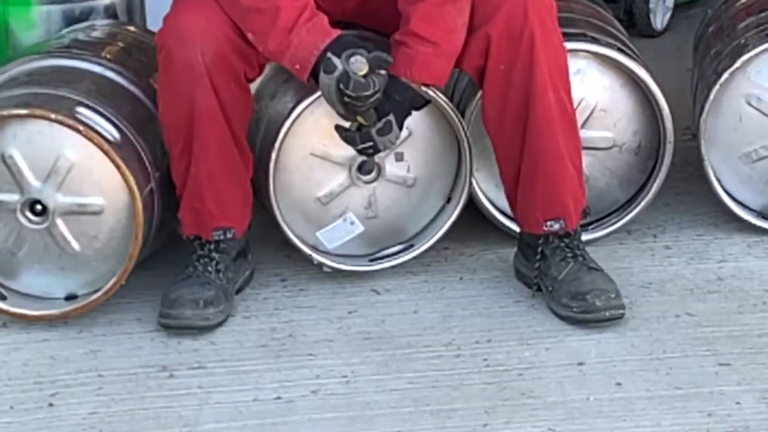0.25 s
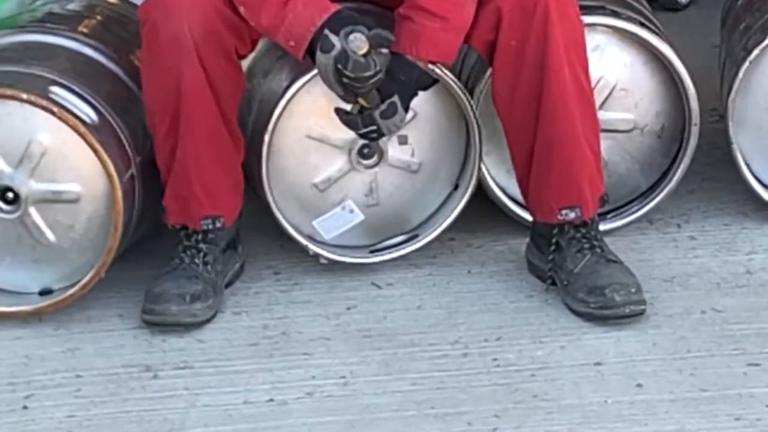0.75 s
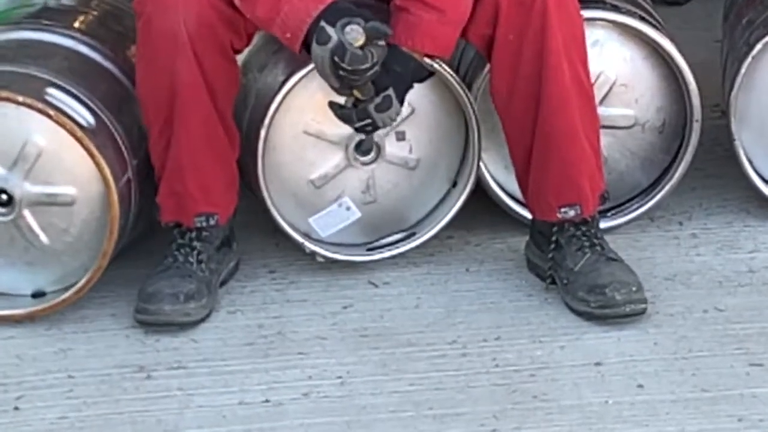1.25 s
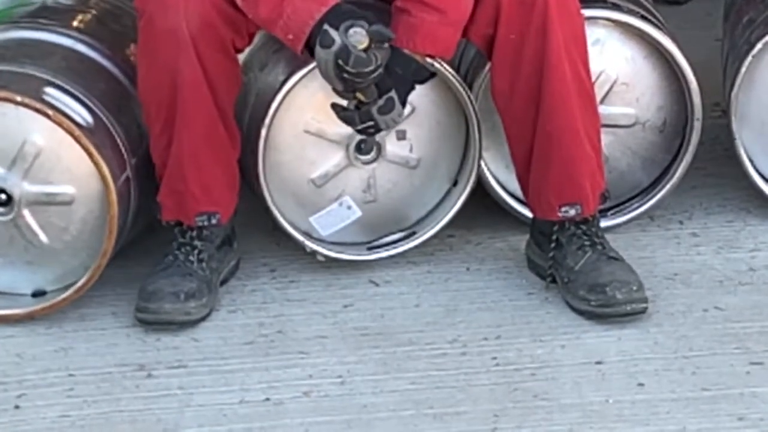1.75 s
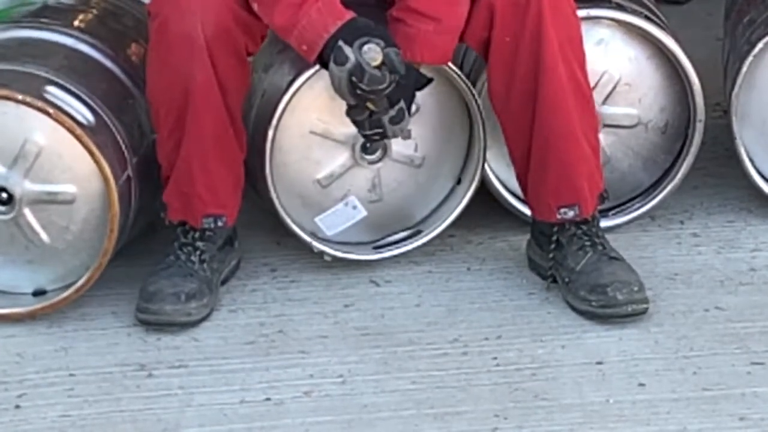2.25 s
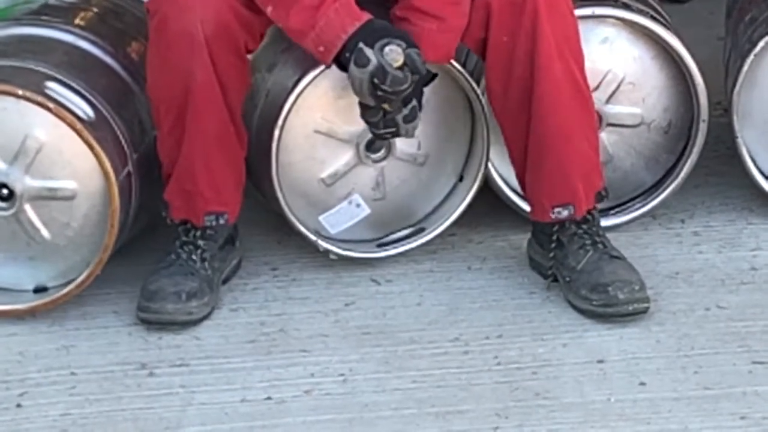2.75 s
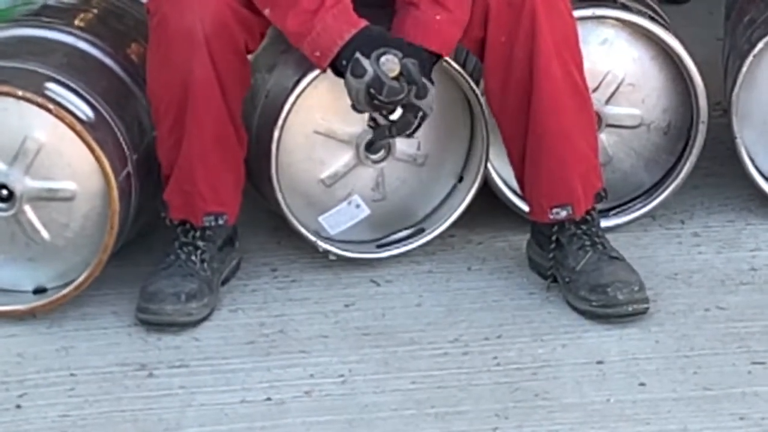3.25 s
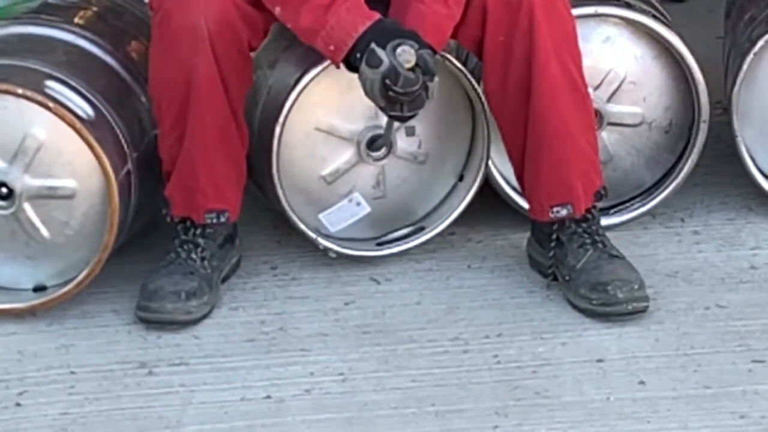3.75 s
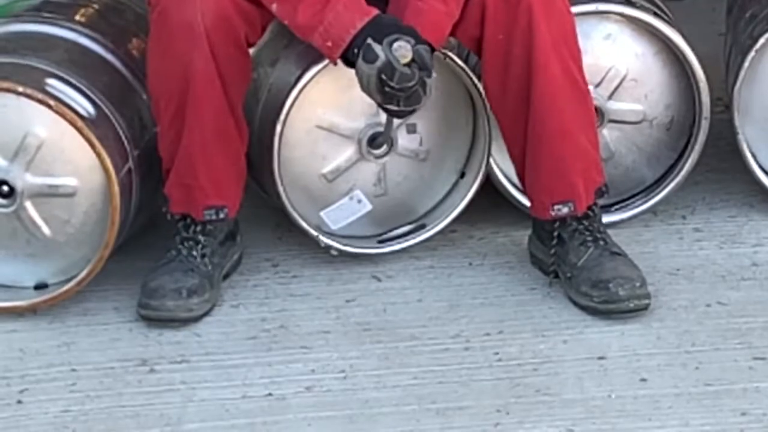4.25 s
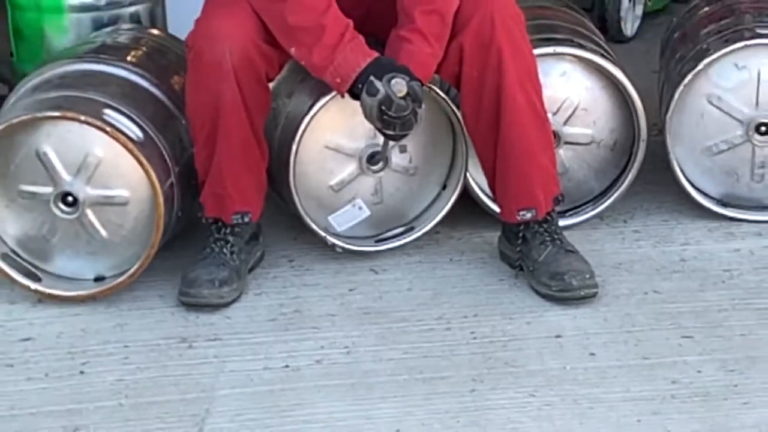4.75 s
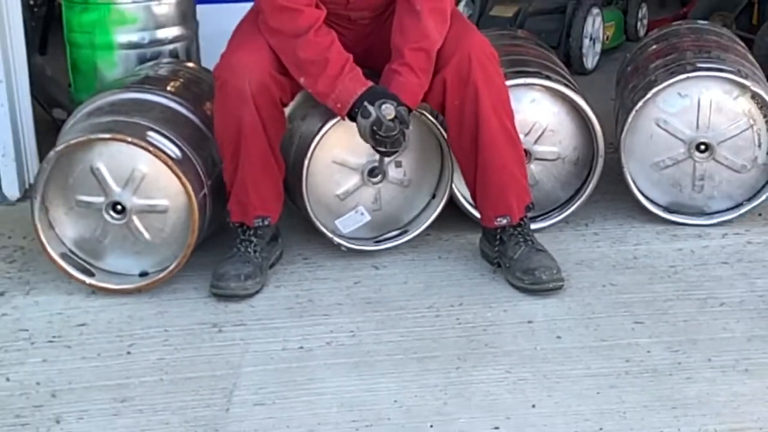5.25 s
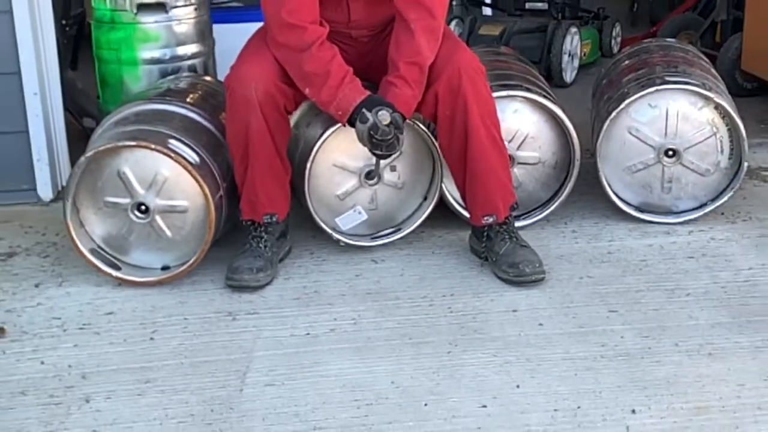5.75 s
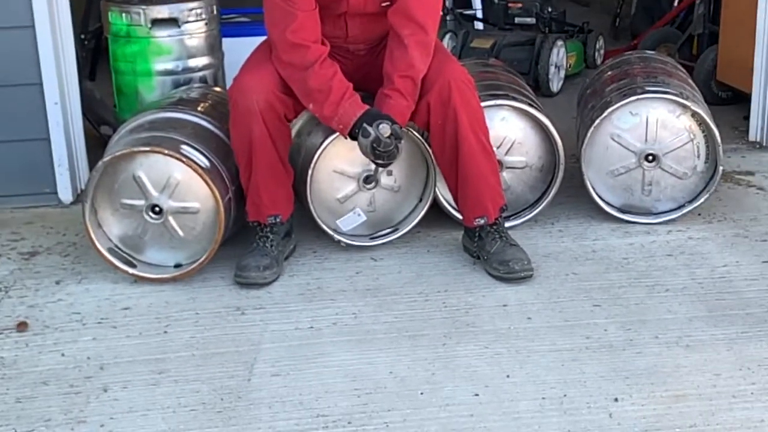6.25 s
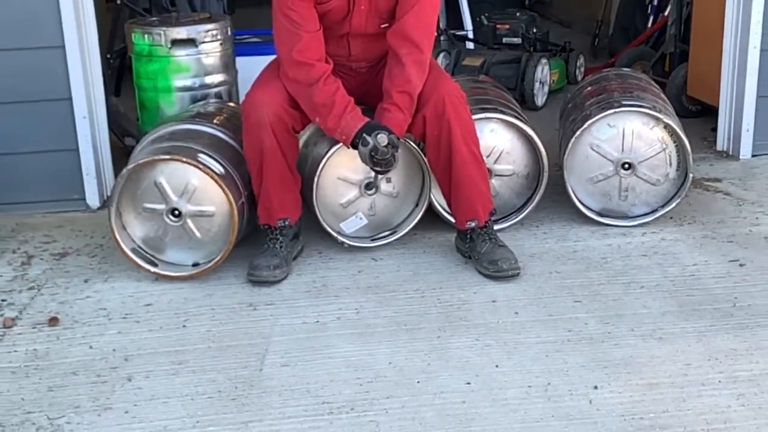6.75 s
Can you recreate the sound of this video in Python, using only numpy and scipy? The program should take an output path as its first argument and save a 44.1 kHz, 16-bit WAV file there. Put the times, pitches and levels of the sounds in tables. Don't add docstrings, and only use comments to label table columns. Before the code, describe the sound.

Metal tool knocks on a hollow keg and short gas spits, then a valve cracks open into a loud, bright hiss that slowly fades.

```python
import sys
import numpy as np
from scipy import signal
from scipy.fft import rfft, irfft, next_fast_len
from scipy.io import wavfile
from scipy.ndimage import uniform_filter1d

SR = 44100
rng = np.random.default_rng(int(sys.argv[2]) if len(sys.argv) > 2 else 0)


def attenuation_scalar(level_db):
    decades = np.asarray(level_db, float) / 20
    return 10 ** decades


def wrap_up_sound(samples):
    columns = np.atleast_2d(samples).T
    tamed = np.clip(columns, -1, 1)
    steps = np.round(tamed * 32767).astype(np.int16)
    wavfile.write(sys.argv[1], SR, steps)


N = 308259
T = np.arange(N) / SR
SIZE = next_fast_len(N + SR)
HZ = np.arange(SIZE // 2 + 1) * SR / SIZE
GRIP_S = 5.225


def unit(x):
    return x / np.sqrt(np.mean(x ** 2))


def read(table):
    f, v = np.transpose(table)
    return np.interp(np.log(HZ + 1), np.log(f), v)


def shape(x, gain):
    return irfft(rfft(x, SIZE) * gain, SIZE)[..., :N]


def hump(hz, width_hz):
    return 1 / (1 + (2 * (HZ - hz) / width_hz) ** 2)


def walk(rate):
    hold = int(SR / rate)
    steps = np.repeat(rng.standard_normal(N // hold + 1), hold)
    return unit(uniform_filter1d(uniform_filter1d(steps, hold), hold)[:N])


def resonance(curve):
    return unit(shape(rng.standard_normal(N), curve))


def spits():
    # t/s, peak level/dB, dullness/dB, T60/s, crack over puff/dB
    spit_events = [(0.2156, -69, 17, 0.21, 1), (0.371, -41.5, -3.5, 0.31, -6),
                   (0.395, -38.5, -5.5, 0.19, -9), (0.6519, -60, 7, 0.47, -6), (0.701, -56, 5, 0.11, 1),
                   (0.8994, -61, -9, 0.099, -18), (0.985, -70.5, 12, 0.68, -15), (1.094, -55, -9, 0.2, -7),
                   (1.108, -48.5, -10.5, 0.15, -1), (1.2244, -64, 5, 0.13, -4), (1.396, -56, 11, 0.24, -1),
                   (1.4743, -38.5, -5.5, 0.15, -18), (1.6294, -70, 16, 0.17, -3),
                   (1.8294, -66, -6, 0.39, -12), (1.8791, -56, -4, 0.14, -9), (1.981, -39, 1.5, 0.28, -0.5),
                   (2.0394, -67, 5, 0.17, -3), (2.0966, -52.5, -5, 0.24, -1), (2.1844, -67, -6, 0.1, -3),
                   (2.2185, -38, -9.5, 0.23, 9), (2.268, -27.5, -8, 0.16, 6.5), (2.3094, -48, 1, 0.41, -3),
                   (2.4463, -35, -7, 0.12, 6.5), (2.4605, -41, -1.5, 0.2, -2)]
    swell_s, crack_s, stem_ring_s = 0.0032, 0.0014, 0.0088
    middle_db, middle_share = -1, 0.19
    out, t = np.zeros((4, N)), T[:SR // 2]
    crack = t / crack_s * np.exp(1 - t / crack_s)
    stem_ring = (1 - np.exp(-t / crack_s)) * np.exp(-t / stem_ring_s)
    for s, db, dull_db, t60, crack_db in spit_events:
        puff = (1 - np.exp(-t / swell_s)) * 1000. ** (-t / t60)
        puff = puff / puff.max() + attenuation_scalar(crack_db) * crack
        parts_db = np.array([[0], [middle_db + middle_share * dull_db], [dull_db]])
        out[:3, int(s * SR):][:, :len(t)] += attenuation_scalar(db - 7 + parts_db) * puff
        out[3, int(s * SR):][:len(t)] += attenuation_scalar(db - 3 + crack_db) * stem_ring
    return out


def hiss(envelopes):
    # f/Hz, level/dB
    jet_spectrum = [(200, -33), (400, -37), (1200, -27.5), (2000, -19), (3500, -10.5), (4300, -8),
                    (5700, -10.5), (6400, -12.5), (7800, -8.5), (9000, 3.5), (10500, -2.5), (12000, -5.5),
                    (15300, -5.5)]
    # f/Hz, width/Hz, lift/dB
    dish_echoes = [(700, 524, 14), (1252, 147, -7), (1417, 106, 8.5), (1908, 125, 4), (1978, 37, -11.5),
                   (2075, 183, 8.5), (2200, 52, -4.5), (2440, 24, 12), (2700, 59, -1.5), (2704, 120, 6),
                   (2975, 36, -17.5), (3120, 88, 1.5), (3503, 130, -10.5), (3600, 71, 7.5), (3962, 26, -20),
                   (4050, 170, 3), (4860, 74, 1), (5420, 170, -4), (6060, 44, 5), (6616, 350, 9.5),
                   (6920, 210, 3.5), (7900, 60, -4), (7280, 90, 4), (9300, 180, -4.5), (10080, 200, -0.5),
                   (14300, 300, 4)]
    colour = attenuation_scalar(read(jet_spectrum) + sum(lift_db * hump(f, width) for f, width, lift_db in dish_echoes))
    low, high = (1 / (1 + (HZ / split_hz) ** 24) for split_hz in (3500, 8000))
    noise = rng.standard_normal(N)
    top, middle, bottom = (shape(noise, colour * band) for band in (1 - high, high - low, low))
    top /= shape(noise, colour * (HZ > 9000) * (HZ < 13000)).std()
    parts = (top, unit(middle), unit(bottom))
    return sum(part * env * attenuation_scalar(.5 * walk(25)) for part, env in zip(parts, envelopes))


def gas():
    # t/s, jet level/dB, dullness/dB
    opening = [
        (1.985, -70, 10),
        (2.15, -77, 16),
        (2.3, -60, 7),
        (2.505, -65, 20),
        (2.512, -27, -1),
        (2.52, -13.5, -4),
        (2.53, -15.5, 2.5),
        (2.545, -21.5, 4.5),
        (2.57, -27, 4.5),
    ]
    # t/s, jet level/dB, dullness/dB
    flow = [(2.64, -24, 1), (2.74, -25.5, 3.5), (3.02, -24.5, 1.5), (3.12, -28, 2), (3.39, -28.5, 0.5),
            (3.86, -28, 0.5), (3.94, -25.5, -2), (4.04, -28.5, 0), (4.6, -31.5, 0.5), (5.01, -33.5, 0.5),
            (5.24, -33.5, -0.5), (5.45, -36.5, 1), (5.95, -36, 0.5), (6.072, -35, -1), (6.296, -38.5, 2),
            (6.668, -44, 3), (6.95, -47, 8), (6.99, -52, 8.5)]
    s, db, dull_db = np.transpose(list(opening) + list(flow))
    db, dull_db = np.interp(T, s, db, left=-150), np.interp(T, s, dull_db)
    middle_db = -3 + 0.86 * dull_db - 4.5 * np.clip((T - GRIP_S) / 0.021, 0, 1)
    held = attenuation_scalar(db + np.array([0 * T + 4.22, middle_db, -11.5 + dull_db]))
    bursts = spits()
    eddies_db = 0.4 * walk(30) + 0.35 * walk(150) + 0.43 * walk(900)
    envelopes = (held + bursts[:3]) * attenuation_scalar(eddies_db)

    t = T[:SR // 2]
    shop_decay_s = (0.047, 0.28, 0.8)
    decay = np.array([1300000.0 ** (-t / t60) * (t > .004) for t60 in shop_decay_s])
    decay /= decay.sum(axis=1, keepdims=True)
    lingering = signal.fftconvolve(envelopes ** 2, decay, axes=1)[:, :N]
    lingering = np.sqrt(np.maximum(lingering, 0))

    bore = resonance(hump(1340, 230)) * bursts[2] * attenuation_scalar(-4)
    stem = resonance(hump(4070, 500)) * bursts[3] * attenuation_scalar(-1)
    shell_curve = sum(hump(hz, 55) for hz in (1120, 1905, 2570, 3260, 4570))
    shell = resonance(shell_curve) * bursts[2] * attenuation_scalar(-5)
    return hiss(envelopes) + bore + stem + shell, np.array([hiss(lingering), hiss(lingering)])


def ports(direct, echo, shade, echo_db):
    # f/Hz, lead/rad
    right_lead = [(1800, 0), (2300, -1.3), (2680, -2.9), (2850, -.8), (3700, -1.3), (4150, 0), (4600, 0),
                  (5150, -3), (5650, -3.2), (5950, -6.28), (7250, -6.1), (7750, -3.9), (8520, -3.14),
                  (16000, 6.48)]
    # f/Hz, left minus right/dB
    port_shade = [(1000, 1), (2400, .5), (3800, 2), (4300, 0), (4900, -8), (5900, -6), (6500, 0),
                  (7600, 2.5), (8200, 0)]
    # f/Hz, echo over direct/dB
    shop_echo = [(300, -10), (1500, -7), (2500, -5), (3900, -4), (4250, -11), (4600, -11), (4900, 0),
                 (5800, 3), (6300, -9), (7100, -5), (7600, -1), (8300, -14), (12000, -12), (16000, -13)]
    lag = np.exp(-.5j * np.interp(HZ, *np.transpose(right_lead)))
    half = attenuation_scalar(shade * read(port_shade) / 2) * lag
    pair, wet = np.array([half, 1 / half]), attenuation_scalar(read(shop_echo) + echo_db)
    total = np.sqrt(1 + wet ** 2)
    return shape(direct, pair / total) + shape(echo, abs(pair) * wet / total)


def knocks():
    # t/s, body level/dB, clack minus body/dB, tick minus body/dB
    knock_events = [
        (0.1711, -30, -6.5, -12),
        (0.667, -30, -1.5, -10),
        (1.373, -27.5, -6.5, -14),
        (1.6014, -29, -5, -23),
        (2.039, -35.5, -3, -11),
    ]
    # f/Hz, level/dB, T60/s
    steel_modes = [(170, -33, 0.039), (283, -2.5, 0.26), (332, -7, 0.23), (458, -23, 0.12),
                   (527, 3.5, 0.075), (605, -16, 0.087), (805, -12, 0.12), (1130, -24, 0.1),
                   (1305, -9, 0.14), (1950, -15, 0.17), (2590, -15, 0.11), (3270, -8, 0.03),
                   (4370, -17, 0.07)]
    bend_start_hz, bend_end_hz, bend_fall_s, bend_s = 1014, 147, 0.0052, 0.0046
    clack_band = signal.butter(2, [140, 900], "band", fs=SR, output="sos")
    tick_band = signal.butter(4, [1500, 4900], "band", fs=SR, output="sos")
    out, t = np.zeros(N), T[:SR // 4]
    bend_hz = bend_end_hz + (bend_start_hz - bend_end_hz) * np.exp(-t / bend_fall_s)
    bend = np.sin(2 * np.pi * np.cumsum(bend_hz) / SR) * t / bend_s * np.exp(1 - t / bend_s) * (t < .03)
    for s, db, clack_db, tick_db in knock_events:
        turn = rng.uniform(-1.1, 1, (len(steel_modes), 2))
        ring = np.zeros(len(t))
        for (f, mode_db, t60), (a, b) in zip(steel_modes, turn):
            tone = np.sin(2 * np.pi * f * (1 + 0.026 * b) * t)
            ring += attenuation_scalar(mode_db + 5.2 * a) * tone * 1000. ** (-t / t60)
        burst = rng.standard_normal((2, len(t))) * 1000. ** (-t / np.array([[.04], [.03]]))
        clack = signal.sosfilt(clack_band, burst[0])
        tick = signal.sosfilt(tick_band, burst[1])
        dull = attenuation_scalar(-1) * bend + attenuation_scalar(-4) * clack / abs(clack).max()
        body = attenuation_scalar(-1.5) * ring / abs(ring).max() + attenuation_scalar(clack_db) * dull
        body *= 1 - np.exp(-t / 0.002)
        out[int(s * SR):][:len(t)] += attenuation_scalar(db) * (body + attenuation_scalar(tick_db) * tick / abs(tick).max())
    tail = rng.standard_normal((2, 2 * len(t))) * 1000. ** (-T[:2 * len(t)] / .5)
    return out + attenuation_scalar(-36) * signal.fftconvolve(out[None], tail, axes=1)[:, :N]


def swell(s, db, length):
    near = slice(max(int((s - 2 * length) * SR), 0), int((s + 2 * length) * SR))
    out = np.zeros(N)
    out[near] = attenuation_scalar(2 * db) * np.exp(-(2 * (T[near] - s) / length) ** 2)
    return out


def wavering(hz, waver, rate, noise):
    tone = np.sin(2 * np.pi * np.cumsum(hz * (1 + waver * walk(rate))) / SR)
    return tone * np.sqrt(hz / SR) + noise * rng.standard_normal(N)


def surroundings():
    # t/s, gain/dB
    gain_control = [
        (2.53, 4),
        (2.58, -14),
        (3.1, -21.5),
        (4.0, -37),
        (5.2, -28.5),
        (6.99, -16),
    ]
    # t/s, level/dB, length/s, reach above the
    # rumble/dB
    gusts = [(0.25, -46, 0.07, -25), (0.404, -36, .06, -28), (0.627, -33, 0.039, -20),
             (0.836, -45, 0.21, -23), (1.043, -35, 0.099, -13), (1.196, -55, .06, -15),
             (1.389, -54.5, 0.02, 19.5), (1.6, -45.5, 0.18, -4), (1.923, -56, 0.091, -20),
             (2.524, -34.5, 0.037, -17), (2.698, -65, 0.11, -3), (4.1, -69, .1, -11), (4.215, -67, .07, -1),
             (4.585, -58.5, .06, -25), (4.995, -53, 0.037, -8), (5.08, -51.5, 0.073, -10),
             (5.433, -60, 0.079, -16), (5.524, -59, 0.055, -11), (5.63, -52.5, 0.025, -3.5),
             (5.706, -52, 0.041, -20), (5.78, -69, 0.036, 7), (5.84, -59, 0.04, -20),
             (6.018, -52.5, 0.065, -8), (6.28, -60, 0.087, -14), (6.97, -61, .08, -5)]
    # t/s, level/dB, length/s
    hum_swells = [(0.188, -37.5, 0.1), (0.47, -39, .1), (0.606, -40.5, 0.092), (0.752, -35.5, 0.066),
                  (0.9, -38.5, .2), (1.05, -37, 0.061), (1.31, -40, .06), (1.406, -45, 0.041),
                  (1.593, -55, 0.17), (1.82, -39.5, 0.025), (1.935, -42.5, 0.079), (2.15, -39, 0.086),
                  (2.52, -47, 0.034)]
    # f/Hz, level/dB
    yard_spectrum = [(82, -50), (140, 1.5), (317, -10.5), (828, -20.5), (951, -22), (1060, -19.5),
                     (1370, -25.5), (4560, -48), (5340, -64), (6240, -53), (9000, -76), (11700, -96),
                     (19800, -120)]
    duck = np.interp(T, *np.transpose(gain_control))
    wind = sum(swell(s, db, length) for s, db, length, _ in gusts)
    reach = sum(swell(s, db + reach_db, length) for s, db, length, reach_db in gusts)
    hum = sum(swell(*row) for row in hum_swells) + reach * attenuation_scalar(2 * 2)
    steady_db = np.array([[-48.5], [-53.5], [-51]])
    steady = attenuation_scalar(2 * (steady_db + duck))
    upper_yard = attenuation_scalar(-59 + 0.88 * duck)
    levels = [*np.sqrt(steady + np.array([wind, hum, reach])), upper_yard]

    yard = attenuation_scalar(read(yard_spectrum)) * (HZ > 130) * (HZ < 9000)
    lower = 1 / (1 + (HZ / 340) ** 6)
    rumble_colour = hump(62.0, 35.0) * (HZ / (HZ + 30)) ** 2
    colours = (rumble_colour, hump(111, 25), yard * lower, yard * (1 - lower))
    rumble_mid, hum_mid = wavering(64, .16, 25, .9), wavering(111, 0.04, 12, 0.37)
    mids = (rumble_mid, hum_mid, *rng.standard_normal((2, N)))

    lag = np.exp(.27j * np.array([[-1], [1]]))
    apart = np.clip(.17 + (HZ / 1000) ** 3, 0, 1) * np.array([[1], [-1]])
    out = attenuation_scalar(-77) * rng.standard_normal((2, N))
    for colour, gain, mid in zip(colours, levels, mids):
        mid_rms = shape(mid, colour).std()
        side = rng.standard_normal(N) * mid_rms / np.sqrt(np.mean(colour ** 2))
        pair = (shape(mid, colour * lag) + shape(side, colour * apart)) / mid_rms
        out = out + pair * gain * attenuation_scalar(0.43 * walk(22))
    return out * attenuation_scalar(np.array([[.4], [-.4]]))


def scene():
    # f/Hz, echo change/dB
    grip_echo = [(2500, 0), (2680, -10), (2850, 0), (4000, 0), (4300, -5), (4900, 0), (5200, -11),
                 (5600, -12), (5850, 0), (6050, -8), (7300, -8), (7700, -6), (8200, 3)]
    direct, echo = gas()
    late = np.clip((T - GRIP_S) / .02, 0, 1)
    before = ports(direct, echo, 0.96, 0)
    after = ports(direct, echo, 0.2, read(grip_echo))
    jet = (1 - late) * before + late * after
    slack = np.clip((T - 6.7) / .05, 0, 1) + late * np.exp(-np.maximum(T - GRIP_S, 0) / .06)
    slack_echo = attenuation_scalar(6) * slack * shape(echo, hump(5370, 450) ** 2)
    return jet + slack_echo + knocks() + surroundings()


def roll_off(x):
    return signal.sosfilt(signal.butter(12, 17110, fs=SR, output="sos"), x)


def record(dry):
    soft = np.tanh(0.96 * dry) / 1.212
    return roll_off(soft)


dry = scene()
out = record(dry)
wrap_up_sound(out)
```